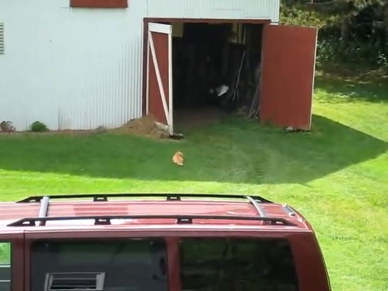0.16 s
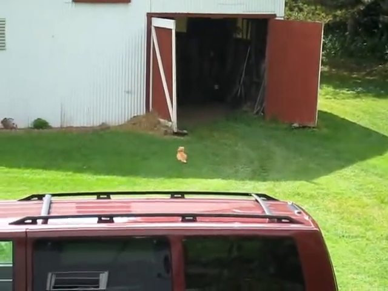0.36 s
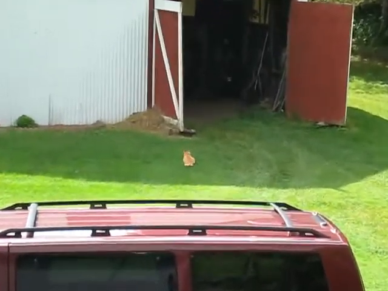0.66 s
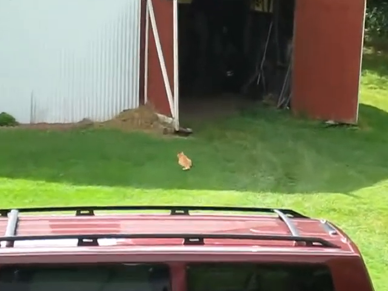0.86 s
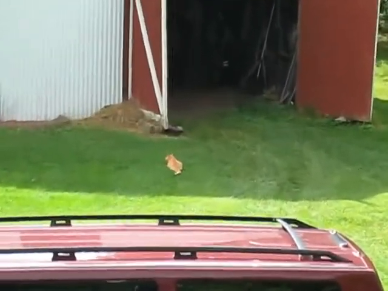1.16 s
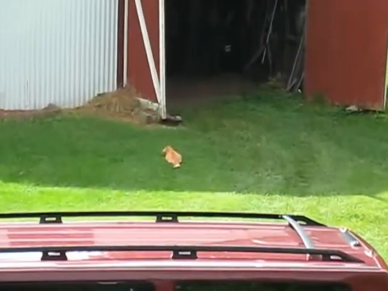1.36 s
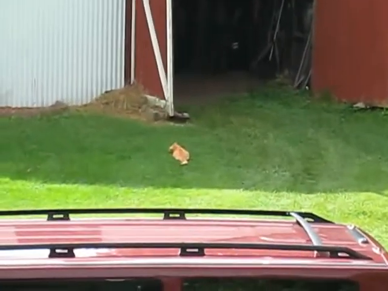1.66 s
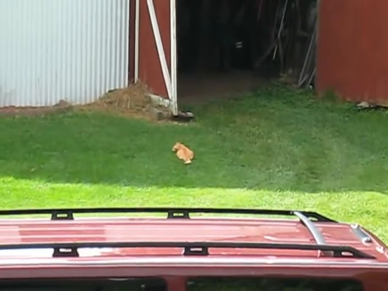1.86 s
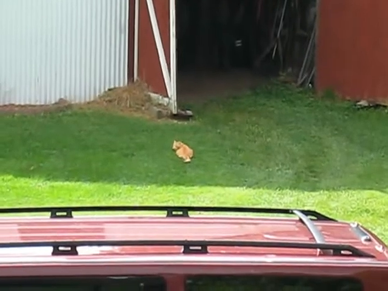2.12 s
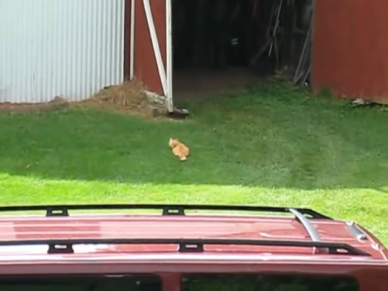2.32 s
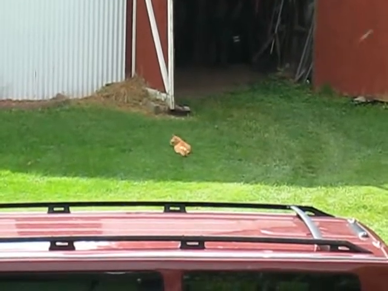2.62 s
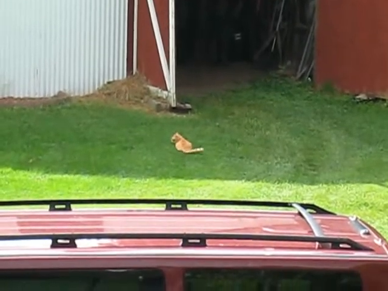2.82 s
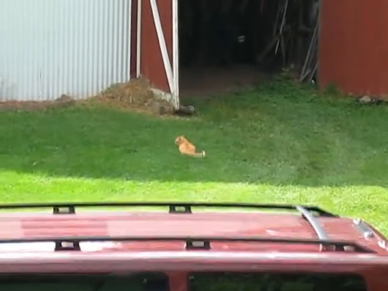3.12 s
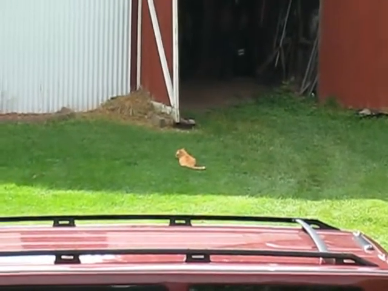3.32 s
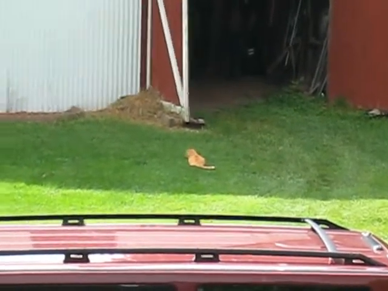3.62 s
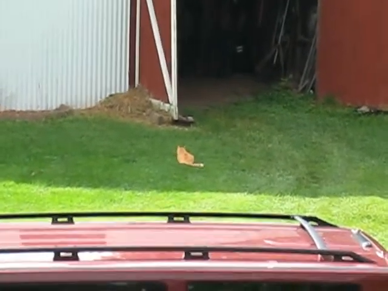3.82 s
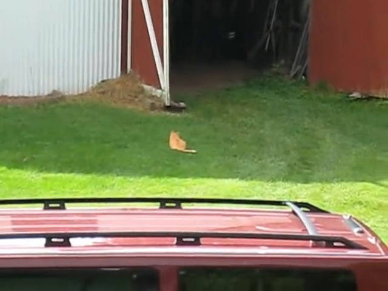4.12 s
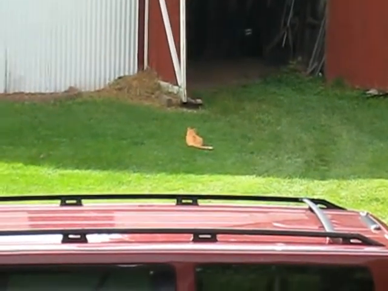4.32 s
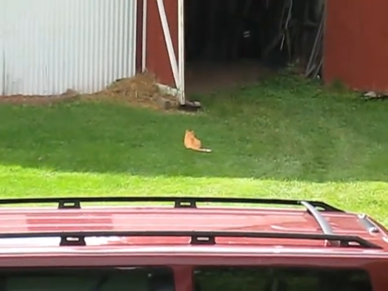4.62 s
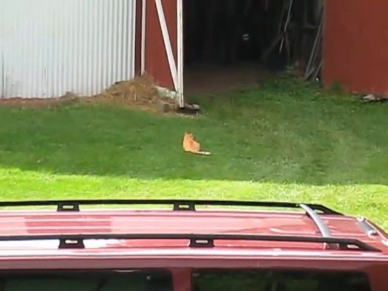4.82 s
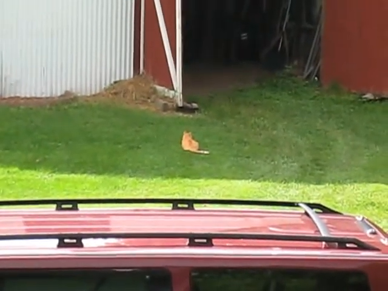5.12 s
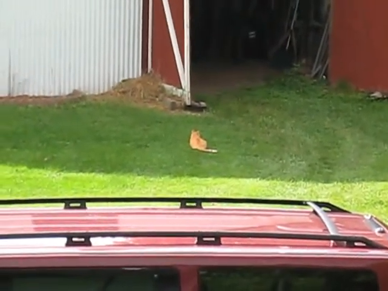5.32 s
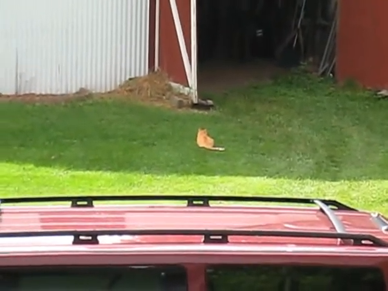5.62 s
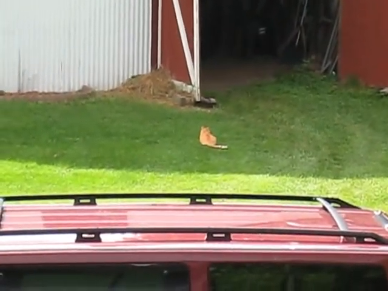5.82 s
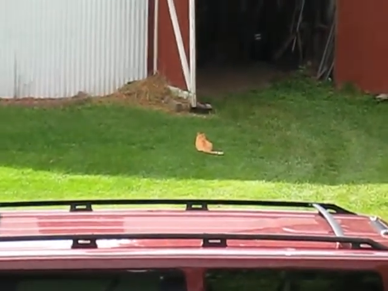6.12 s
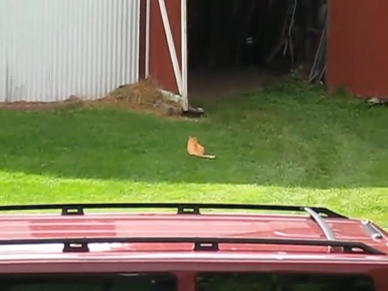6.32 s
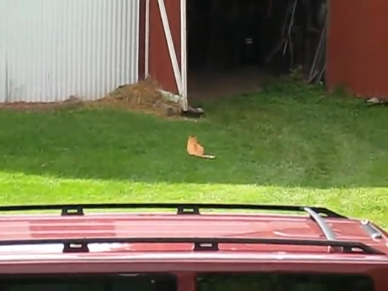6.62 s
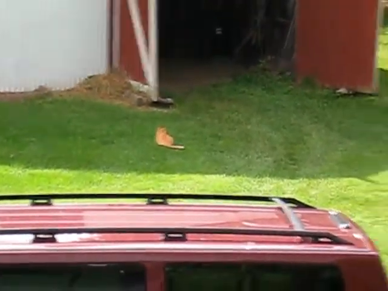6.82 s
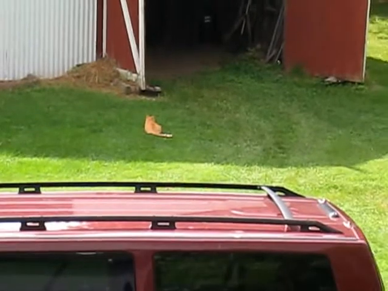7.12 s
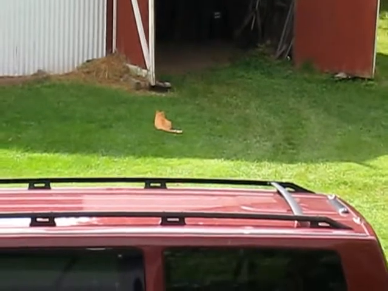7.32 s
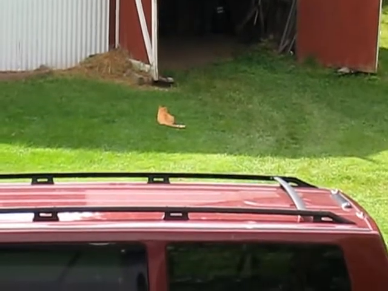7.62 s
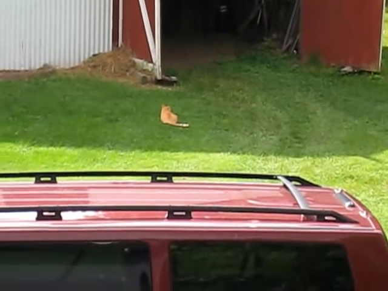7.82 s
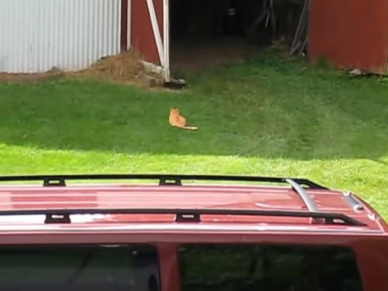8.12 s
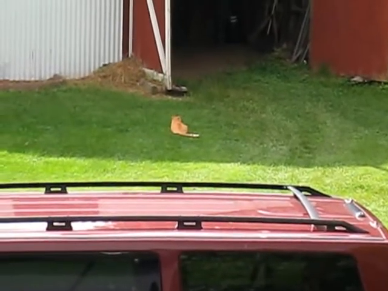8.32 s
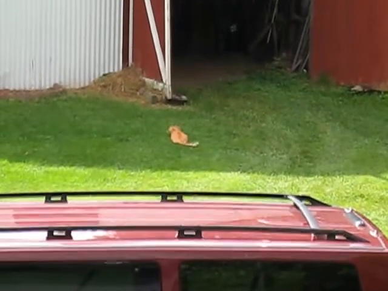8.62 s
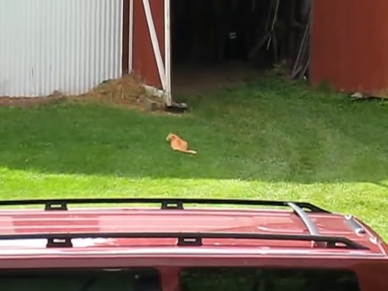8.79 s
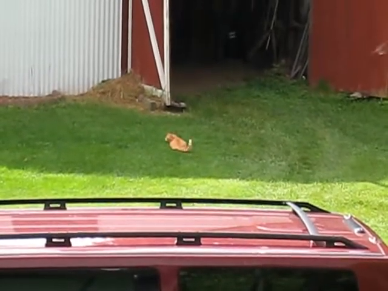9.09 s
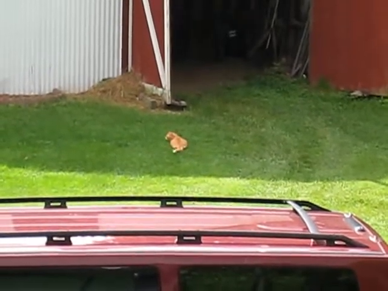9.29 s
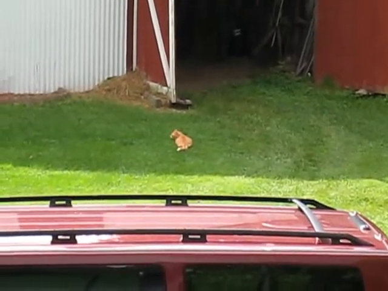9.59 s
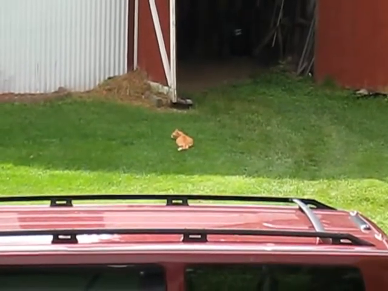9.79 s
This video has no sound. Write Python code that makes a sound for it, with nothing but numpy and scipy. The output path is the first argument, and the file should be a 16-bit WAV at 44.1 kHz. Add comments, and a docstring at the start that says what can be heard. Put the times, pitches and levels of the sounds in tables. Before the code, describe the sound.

A quiet barnyard heard through a handheld camera microphone for about ten seconds. Heavy wind pops and low flutters open the scene, strongest until 0.7 s, with a scratchy rub and sharp plastic clicks near 0.1 and 0.3 s and again around 1.1 s. A swallow calls from 0.2 s: a very high rising whistle, then a quick dipping warble, each pair about a fifth of a second. Five calls crowd the first 1.8 s; more come at 2.4, 2.7, 3.1, 3.8 and 4.2, then 5.3, 5.6, 6.0, 6.9, 7.55, 8.9, 9.1 and 9.6 s. Short barn echoes and a light yard ring follow, fuller after 2 s. Softer wind bumps return around 3.0, 5.7, 6.6, 7.2 and 8.0 s. Faint hoarse yelps occur at 3.1 and 6.8 s, beneath a soft murmur and a very faint engine hum that recedes after 5 s.

```python
"""A barnyard, in which a circling swallow scolds a cat with a two-note alarm: a rising whistle, then a quick
warble, each a gliding tone with weak overtones, side tones and rasp. Delayed copies form the echoes of the barn
and decaying noise the ring of the yard. Shaped noise and short pulses are the wind on a camera's microphone; noise
and damped modes are an early scuff and clicks on its case. Faint hoarse yelps, a murmur of noise and the sines
of a far engine lie beneath."""
import sys
import numpy as np
from scipy import signal
from scipy.fft import rfft, irfft, next_fast_len
from scipy.io import wavfile
from scipy.ndimage import uniform_filter1d, map_coordinates

SR = 44100
rng = np.random.default_rng(int(sys.argv[2]) if len(sys.argv) > 2 else 0)


def wav_record(signal):
    """Record a signal, one row per channel, as 16-bit PCM in the file named by sys.argv[1]."""
    frames = np.transpose(np.atleast_2d(signal))
    bounded = np.clip(frames, -1, 1)
    # unit amplitude maps onto the largest positive 16-bit level
    quanta = np.round(bounded * 32767).astype(np.int16)
    wavfile.write(sys.argv[1], SR, quanta)


N = 438794  # length in samples

# Spectrum of the distant murmur. Each row: frequency in Hz, relative density in dB per Hz.
MURMUR_SPECTRUM = [(20, -16), (55, 4), (120, -4), (175, -8.5), (225, -4.5), (330, -5), (540, -5.5),
                   (940, -7), (1310, -10), (5150, -18.5), (12000, -25), (15700, -32)]
# Tones of a far engine. Each row: mean frequency in Hz, level in dB before its swell.
ENGINE_TONES = [(178, -60), (269, -66), (334, -71)]
# The engine draws near and recedes. Each row: time in seconds, change of level in dB.
ENGINE_SWELL = [(0, -0.5), (3, 1), (5.3, 0), (7, -7), (9.95, -10)]
AIR_DB = -50.5  # mean level of the murmur

# Faint far-off yelps. Each row: start in seconds, relative level in dB, pitch at the start in Hz.
FAR_YELPS = [(3.09, -51, 1550), (6.842, -47, 1369)]
# Noisy part of the yelps. Each row: frequency in Hz, relative density in dB per Hz.
HOARSE_SPECTRUM = [(500, -17), (800, -8.5), (1400, -4.5), (1800, -9.5), (2600, -20), (4000, -39)]

# Gusts that reach the microphone. Each row: start in seconds, length in seconds, strength in dB.
GUST_TIMES = [(0, .035, -10), (0.107, .085, -11), (.345, .035, -23), (.42, .03, -24), (0.614, 0.08, -23.5),
              (0.739, 0.244, -30), (1.056, 0.1413, -30), (1.218, 0.207, -35.5), (1.668, 0.1713, -29.5),
              (1.884, 0.318, -35.5), (2.286, 0.053, -31), (2.455, 0.075, -35.5), (2.792, 0.285, -38),
              (3.629, 0.276, -42), (4.32, .04, -41), (4.704, 0.016, -42), (4.847, 0.0206, -41.5),
              (5.646, .48, -34.5), (6.527, .26, -30.5), (7.192, 0.028, -24.5), (7.405, 0.412, -38),
              (7.808, 0.13, -32), (7.969, .08, -27), (8.469, .21, -39.5), (8.954, 0.294, -44)]
# The breeze between gusts. Each row: time in seconds, strength in dB.
BREEZE_COURSE = [(0, -33.5), (.6, -39.5), (1, -40), (1.5, -45), (2.9, -46.5), (3.3, -53), (4.4, -48),
                 (5.2, -54.5), (6.3, -43.5), (7.6, -45), (8.3, -51), (9.95, -47)]
# Buffeting in light wind. Each row: frequency in Hz, relative density in dB per Hz.
LIGHT_WIND_SPECTRUM = [(12, -35.5), (20, -12), (91, 0), (129, 1.5), (188, -0.5), (424, -16.5), (630, -40),
                       (1160, -38.5), (1500, -33), (1950, -46), (3300, -120)]
# Buffeting in strong wind. Each row: frequency in Hz, relative density in dB per Hz.
STRONG_WIND_SPECTRUM = [(20, -32), (60, -17), (120, -5), (200, 1), (350, -1), (520, -6), (800, -11),
                        (1200, -25), (1600, -42), (3000, -62)]
# The strongest eddies pop on the microphone. Each row: centre in seconds, relative level in dB.
EDDIES = [(.005, -4), (.029, -3), (.115, -4), (.177, -5.5), (.195, -3.5), (.349, -17), (.363, -8),
          (.429, -8), (.624, -13.5), (.638, -10), (.689, -16), (.7, -14.5), (.841, -18), (.867, -16),
          (.912, -9), (.986, -17.5), (1.149, -17), (1.602, -17.5), (1.811, -19), (2.106, -16.5),
          (3.005, -14), (4.354, -25.5), (5.655, -23.5), (5.867, -20.5), (6.025, -22.5), (6.589, -12),
          (7.078, -19), (7.218, -14), (7.983, -20), (8.014, -15), (8.029, -17.5)]
EDDY_HZ, EDDY_DB_PER_OCTAVE = 318.8, 35  # pitch of a 0 dB eddy; weaker eddies are slower and lower
GUST_ATTACK_S, GUST_RELEASE_S = 0.0183, 0.0489  # time to rise or fall by 20 dB

# Strokes that rub the case. Each row: peak in seconds, relative level in dB, seconds to swell by 20 dB,
# seconds to fade by 20 dB. Where both times are negative they trade places: the first fades, the second swells.
RUBS = [(0.085, -37, -0.0045, -0.0374), (.224, -28, 0.0231, 0.0579), (0.312, -15.3, .068, 0.0081),
        (1.078, -30.5, .042, .022)]
# Catches of the rub. Each row: start in seconds, peak of the ring in dB.
CATCHES = [(.082, -17.5), (0.3059, -20), (0.3123, -7.5), (1.061, -21), (1.1053, -12.5)]
# Spectrum of the rub. Each row: frequency in Hz, relative density in dB per Hz.
RUB_SPECTRUM = [(350, -52), (600, -30), (844, -25), (1340, -15), (1460, -20.5), (1600, -6), (1770, -5.5),
                (2320, 1), (2930, -9), (3850, -10.5), (11500, -21.5), (13000, -19), (15700, -25.5)]
# Modes of the camera case. Each row: frequency in Hz, relative level in dB, time to decay by 60 dB in seconds.
CASE_MODES = [(1966, 4.5, 0.016), (2390, 4.5, 0.0174), (3450, -11, 0.01), (8900, -14, 0.008)]

# Reverberation of the yard. Each row: frequency in Hz, time to decay by 60 dB in seconds.
YARD_DECAY = [(3000, 0.662), (5000, 0.6104), (7000, 0.715), (12000, 0.085)]
# Reflections change as the bird flies about. Each row: time in seconds, farther wall in dB, near scatter in dB.
FLIGHT_REFLECTIONS = [(0.3, -29.5, -11.5), (1.3, -22, -11), (2.4, -10, -4.5), (4.3, -13, -6),
                      (9.6, -16, -4)]
# Course of the whistle. Each row: share of its length, pitch in Hz before the call's factor,
# relative level in dB, side tones in dB relative to the fundamental.
RISE_COURSE = [(0, 3201, -14, -29), (.17, 4403, -1, -29), (.34, 5217, 5.5, -29), (.5, 5997, 7, -48.5),
               (.68, 6705, 0, -46.5), (.8, 7046, -.5, -40.5), (.92, 6752, -1.5, -39.5), (1, 5650, 0, -27.5)]
# Course of the warble. Each row: share of its length, pitch in Hz at a dip depth of 1 before a fixed factor,
# relative level in dB, side tones in dB relative to the fundamental.
WARBLE_COURSE = [(0, 3120, -8, -40.5), (.07, 4668, -3, -30.5), (.15, 5670, 2.5, -31), (.23, 5691, 0.5, -36),
                 (.33, 5261, 6, -37), (.46, 4360, 2.5, -36), (.57, 4592, 5, -41.5), (.7, 5178, 4, -33.5),
                 (.81, 5506, 5, -24.5), (.92, 5105, 3.5, -24.5), (1, 4532, -0.5, -24)]
# Strength of overtones. Each row: overtone frequency in Hz, level in dB relative to the note before brightness.
OVERTONE_LEVELS = [(7000, -33), (8500, -26.5), (10000, -34.5), (11500, -29), (12500, -19), (13600, -14),
                   (15500, -28.5)]
# Noise in the voice. Each row: frequency in Hz, relative density in dB per Hz.
RASP_SPECTRUM = [(2000, -19), (5000, 13), (7300, -16), (8400, 4), (9600, -15.5), (11500, -0.5),
                 (13500, -10), (15800, -19)]
# Two-note alarms. Each row: start in seconds, gap to the warble in seconds, whistle pitch factor, depth of the
# warble's dip, level in dB, brightness in dB, barn echo delay in seconds, barn echo in dB.
ALARM_CALLS = [(0.233, 0.1009, 0.945, 1.01, -32.5, 4, 0.018, -2),
               (0.494, 0.1008, 1.0, 0.645, -29, -2, 0.0126, -7),
               (0.854, 0.1048, 0.9856, 0.965, -30.5, 2, .01, -25.5),
               (1.204, 0.1079, 1.0, 0.834, -31.5, 3, .033, -18),
               (1.574, 0.1146, 0.995, 1.02, -33, 4.5, 0.014, -23),
               (2.402, 0.1011, 0.938, 1.27, -35, 1.5, .018, -4.5),
               (2.696, 0.114, 0.958, 0.969, -32.5, -3, 0.0063, -11.5),
               (3.098, 0.1097, 0.9716, 1.105, -31, 2.5, 0.00807, -4.5),
               (3.824, 0.09, 0.988, 0.95, -33, 5, 0.0101, -5.5),
               (4.215, 0.1147, 0.9584, 1.085, -32, 5.5, .007, -21.5),
               (5.334, .094, 0.962, 1.14, -35, 1, .02, -11.5),
               (5.638, 0.1062, 0.967, 0.913, -32.5, -2, 0.00776, -9),
               (6.03, .110, 0.9575, 1.05, -34.5, -0.5, 0.0099, -0.5),
               (6.905, 0.0988, .98, 1.05, -33, 5, 0.00623, -8.5),
               (7.55, 0.0963, 0.986, 0.974, -32, 6.5, .006, -2.5),
               (8.879, 0.0939, 0.978, 1.185, -34.5, 0.5, .022, -5),
               (9.14, 0.1138, 0.964, 0.77, -34, -2.5, .007, -10.5),
               (9.565, 0.0999, 0.962, 1.114, -31.5, 1, .007, -9.5)]
RISE_SHARE = .55  # the whistle lasts this share of the gap
WARBLE_S, WARBLE_DB = .078, 1.5  # warble at a dip depth of 1: length, and level over that of the call
CREST_HZ = 5750  # pivot of the dip: pitches here do not depend on its depth
DIP_DB, DIP_S = -4.5, -0.0123  # a deeper dip is weaker and quicker: change per unit of depth

TOP_HZ = 15830  # band limit of the camera


def amp(db):
    """Decibel law: a level as an amplitude ratio."""
    return 10 ** (np.asarray(db) / 20)


def unit(x):
    """Normalisation to a root mean square of 1."""
    return x / np.sqrt(np.mean(x ** 2) + 1e-20)


def along(points, hz):
    """Interpolation of (Hz, value) points on a logarithmic frequency axis."""
    f, v = np.transpose(points)
    return np.interp(np.log(hz + 1), np.log(f + 1), v)


def curve(rows):
    """Linear interpolation of (seconds, value) rows at every sample."""
    return np.interp(np.arange(N) / SR, *np.transpose(rows))


def wobble(rate, size=N):
    """Slow random modulation: a spline through rate random knots a second."""
    knots = rng.standard_normal(int(size * rate / SR) + 4)
    return map_coordinates(knots, [np.arange(size) * rate / SR])


def filtered(x, response):
    """Linear filtering: the spectrum of x times a response of frequency."""
    m = next_fast_len(len(x) + SR // 4)
    return irfft(rfft(x, m) * response(np.fft.rfftfreq(m, 1 / SR)), m)[:len(x)]


def coloured(x, spectrum):
    """Spectral shaping: x filtered to a spectrum, at rms 1."""
    return unit(filtered(x, lambda hz: amp(along(spectrum, hz))))


def add(track, s, sound):
    """Superposition: a sound summed into the track at s seconds."""
    start = round(s * SR)
    sound, start = sound[max(-start, 0):], max(start, 0)
    track[start:start + len(sound)] += sound[:N - start]


def swell(s, hold, db, attack, release):
    """Exponential envelope: it reaches db at s, holds and falls; attack and release are seconds per 20 dB."""
    t = np.arange(N) / SR - s
    return amp(db - 20 * np.clip(np.maximum(-t / attack, (t - hold) / release), 0, 10))


def yard_tail(ripple_db=2.5):
    """Diffuse reverberation of energy 1: each frequency decays exponentially at its own rate."""
    hz, t, z = signal.stft(rng.standard_normal(SR * 3 // 4), SR, nperseg=256)
    decay = amp(-60 * t / along(YARD_DECAY, hz)[:, None])
    onset = 1 - np.exp(-t / 0.00364)
    tail = signal.istft(z * decay * onset, SR, nperseg=256)[1]
    tail = tail * amp(ripple_db * wobble(250, len(tail)))  # reflections arrive in bunches
    return tail / np.linalg.norm(tail)


def countryside(drift_db=0.6):
    """Sum of many far sources: a steady shaped noise, with the slightly wavering sines of a far engine."""
    out = amp(AIR_DB + drift_db * wobble(5)) * coloured(rng.standard_normal(N), MURMUR_SPECTRUM)
    for hz, db in ENGINE_TONES:
        phase = 2 * np.pi * np.cumsum(hz + 2.5 * wobble(10)) / SR
        level = amp(db + curve(ENGINE_SWELL) + 1.5 * wobble(4))
        out += level * unit(np.sin(phase))
    return out


def far_calls(length=0.0534, glide=0.261, clear_life=0.0125, hoarse_db=-2, wet_db=-4):
    """Voice breaking into noise: a rising tone dies under hoarse noise, and reverberation blurs the yelp."""
    out, size = np.zeros(N), round(length * SR)
    t = np.arange(size) / SR
    for s, db, start_hz in FAR_YELPS:
        phase = 2 * np.pi * np.cumsum(start_hz * (1 + glide * t / length)) / SR
        clear = 2 * np.sin(phase) * np.exp(-t / clear_life)
        hoarse = amp(hoarse_db) * coloured(rng.standard_normal(size), HOARSE_SPECTRUM)
        yelp = amp(db) * (clear + hoarse) * signal.windows.tukey(size, .3)
        add(out, s, yelp)
        add(out, s, amp(wet_db) * signal.fftconvolve(yelp, yard_tail()))
    return out


def airflow():
    """Addition of powers: the strength of gusts over a light breeze."""
    gusts = sum(swell(s, length, db, GUST_ATTACK_S, GUST_RELEASE_S) ** 2 for s, length, db in GUST_TIMES)
    return np.sqrt(amp(curve(BREEZE_COURSE)) ** 2 + gusts)


def wind(buffet_db=-3.0, lump_db=4.2, puff_db=-2.5, puff_width=0.43, knee_db=-49, brisk_db=-36,
         ceiling_db=-20, skirt_db=-9):
    """Turbulent pressure on a microphone port: lumpy noise, and the strongest eddies as single pushes and pulls."""
    level = airflow()
    gusting = level ** 2 / (level ** 2 + amp(knee_db) ** 2)  # light air leaves the port quiet
    lumps = amp(lump_db * wobble(90))
    slow = coloured(rng.standard_normal(N) * lumps, LIGHT_WIND_SPECTRUM)
    fast = coloured(rng.standard_normal(N) * lumps, STRONG_WIND_SPECTRUM)
    brisk = 1 / (1 + amp(brisk_db - curve(BREEZE_COURSE)) ** 4)  # a stiffer breeze sheds smaller, higher eddies
    turbulence = np.sqrt(1 - brisk) * slow + np.sqrt(brisk) * fast
    rumble = level / np.hypot(1, level / amp(ceiling_db))  # in a hard gust the single eddies take over
    out = amp(buffet_db) * rumble * gusting * turbulence
    t = np.arange(-SR // 50, SR // 50) / SR
    for s, db in EDDIES:
        cycles = t * EDDY_HZ * 2 ** (db / EDDY_DB_PER_OCTAVE)
        swing = np.cos(2 * np.pi * (cycles + rng.random())) / np.cosh(cycles / puff_width) ** 2
        add(out, s + t[0], amp(db + puff_db) * (swing + amp(skirt_db) * swing ** 3))
    return out


def handling(scuff_db=0, grit_db=3.0, crack_db=-10, release=0.0014):
    """Friction and modal ringing: rough noise as the case is rubbed, damped modes where the rub catches."""
    pressure = sum(swell(s, 0, db, attack, fade) for s, db, attack, fade in RUBS)
    grit = rng.standard_normal(N) * amp(grit_db * wobble(980))
    out = amp(scuff_db) * pressure * coloured(grit, RUB_SPECTRUM)
    t = np.arange(SR // 20) / SR
    highpass = signal.butter(2, 1500, "high", fs=SR, output="sos")  # a small case makes no bass
    for s, db in CATCHES:
        ring = sum(amp(level - 60 * t / t60) * np.sin(2 * np.pi * hz * t) for hz, level, t60 in CASE_MODES)
        snap = amp(crack_db - 60 * t / release) * rng.standard_normal(len(t))
        crack = signal.sosfilt(highpass, snap)
        add(out, s, amp(db) * (ring / np.abs(ring).max() + crack))
    return out


def paths(delay, wall_db, far_db, scatter_db, scatter_life=.022, tail_db=-9, far_delay=.055,
          far_spread=.002, count=24):
    """Impulse response: direct sound, barn, farther wall, scatter from car, doors and ground, and the yard's ring."""
    h = amp(tail_db) * yard_tail()
    h[0] += 1
    h[round(abs(delay) * SR)] += amp(wall_db)
    for start, spread, db in ((.002, scatter_life, scatter_db), (far_delay, far_spread, far_db)):
        late = np.clip(start + rng.exponential(abs(spread), count), 0, .3)  # uneven surfaces answer in clusters
        h[(late * SR).astype(int)] += amp(db) * unit(rng.standard_normal(count)) / np.sqrt(count)
    return h


def note(shape, length, pitch, db, bright_db, rasp_db, jitter=0.01097, stray=0.01195, flutter_db=2.8,
         beat_hz=2200, third_db=-9, shimmer_db=3):
    """Modulation in a syrinx: its second side beats with a gliding whistle, giving side tones; overtones and rasp."""
    size = round(length * SR)
    u = np.linspace(0, 1, size)
    knots, *cols = np.transpose(shape)
    hz, level_db, side_db = [uniform_filter1d(np.interp(u, knots, c), size // 12, mode="nearest") for c in cols]
    # no two notes bend alike
    hz = hz * pitch * (1 + jitter * wobble(580.1, size) + stray * wobble(69.73, size))
    phase = 2 * np.pi * np.cumsum(hz) / SR
    beat = 2 * np.pi * np.cumsum(beat_hz * (1 + 0.0437 * wobble(193.4, size))) / SR
    tone = np.sin(phase) * (1 + 2 * amp(side_db) * np.sin(beat))
    for k, order_db in ((2, 0.00098), (3, third_db)):
        overtone_db = bright_db + order_db + along(OVERTONE_LEVELS, k * hz) + shimmer_db * wobble(156.2, size)
        tone += amp(overtone_db) * np.sin(k * phase)
    tone += amp(bright_db + rasp_db) * coloured(rng.standard_normal(size), RASP_SPECTRUM)
    envelope = amp(level_db + flutter_db * wobble(200.45, size)) * signal.windows.tukey(size, .06)
    return amp(db) * unit(tone * envelope)


def swallow(rise_db=-2):
    """Convolution with a room: whistle and warble of a call share one impulse response, new for every call."""
    out = np.zeros(N)
    times, *reflections = np.transpose(FLIGHT_REFLECTIONS)
    for s, gap, pitch, dip, db, bright_db, delay, wall_db in ALARM_CALLS:
        h = paths(delay, wall_db, *[np.interp(s, times, r) for r in reflections])
        rise = note(RISE_COURSE, RISE_SHARE * gap, pitch, db + rise_db, bright_db, rasp_db=-27.5)
        # after its opening sweep the warble swings down from the crest by the call's own depth
        swings = [(u, CREST_HZ * (hz / CREST_HZ) ** dip, *levels) for u, hz, *levels in WARBLE_COURSE[2:]]
        course = list(WARBLE_COURSE[:2]) + swings
        warble_s = WARBLE_S + DIP_S * (dip - 1)
        warble_db = db + WARBLE_DB + DIP_DB * (dip - 1)
        warble = note(course, warble_s, 0.9946, warble_db, bright_db, rasp_db=-25)
        add(out, s, signal.fftconvolve(rise, h))
        add(out, s + gap, signal.fftconvolve(warble, h))
    return out


def scene():
    """Superposition of all sources at one microphone."""
    return (countryside() + far_calls() + wind() + handling() + swallow())[None]


def record(dry):
    """Band limitation: the camera keeps nothing at or above TOP_HZ."""
    return filtered(dry[0], lambda hz: hz < TOP_HZ)[None]


dry = scene()
out = record(dry)
wav_record(out)
```